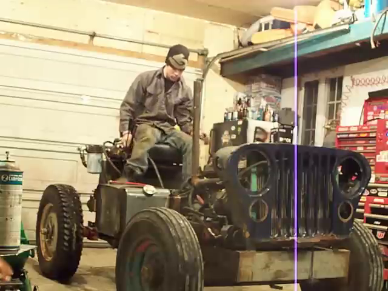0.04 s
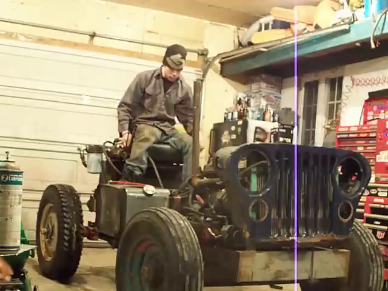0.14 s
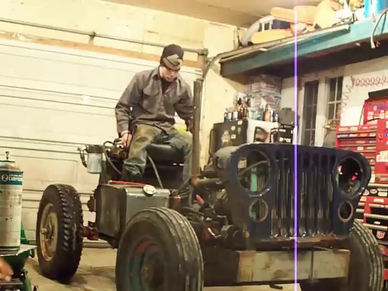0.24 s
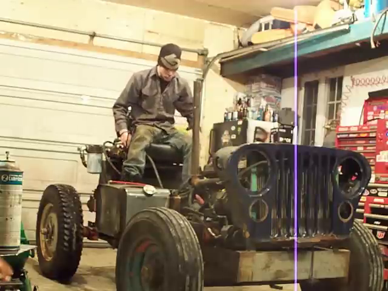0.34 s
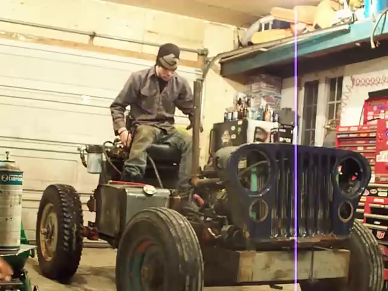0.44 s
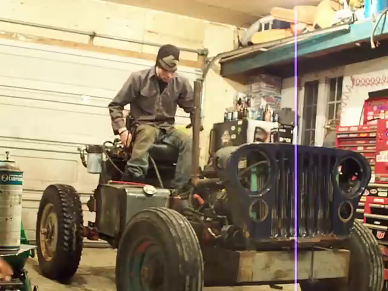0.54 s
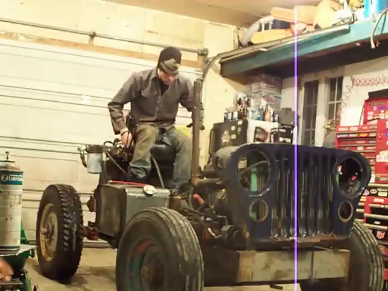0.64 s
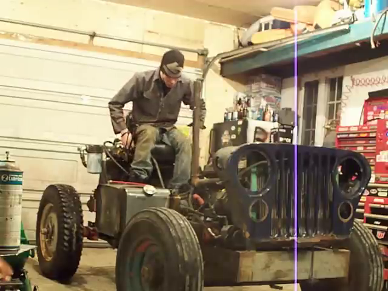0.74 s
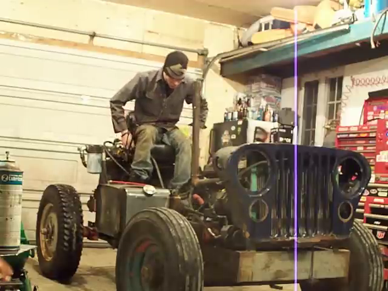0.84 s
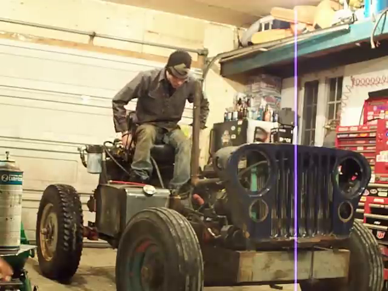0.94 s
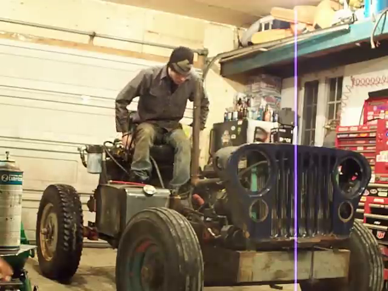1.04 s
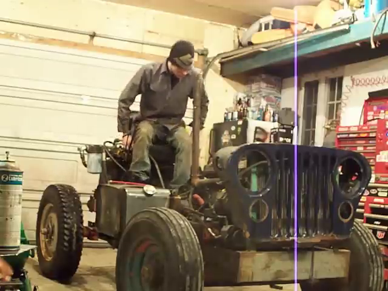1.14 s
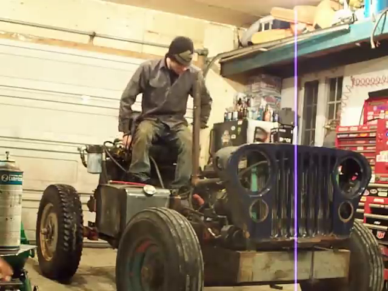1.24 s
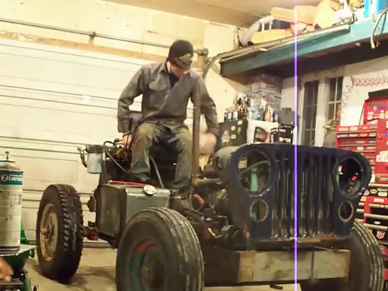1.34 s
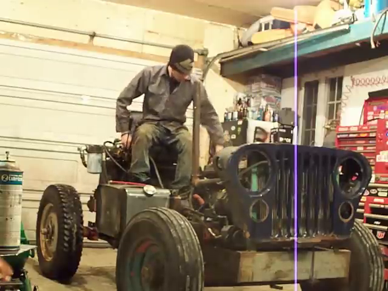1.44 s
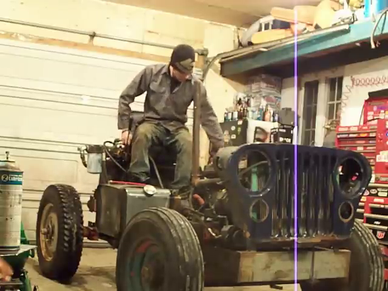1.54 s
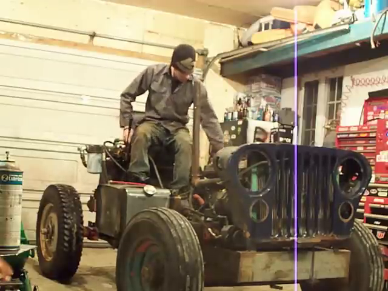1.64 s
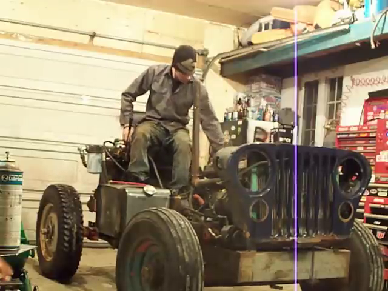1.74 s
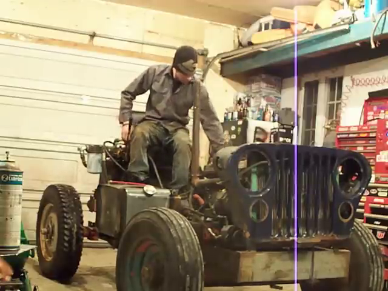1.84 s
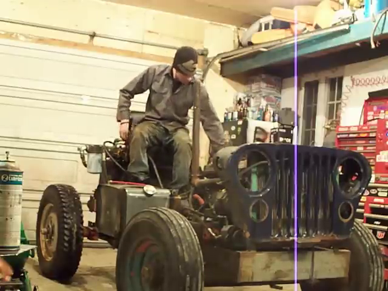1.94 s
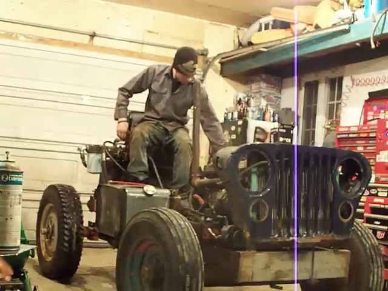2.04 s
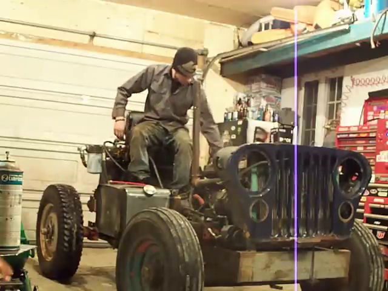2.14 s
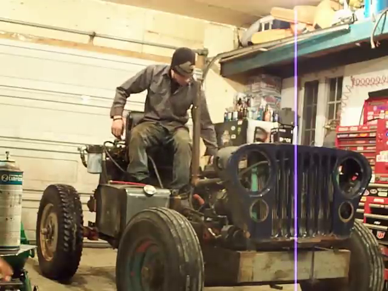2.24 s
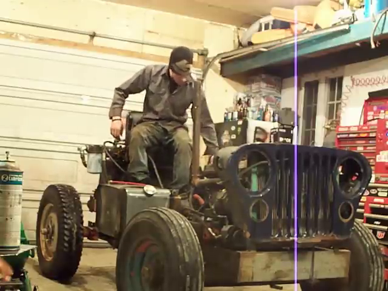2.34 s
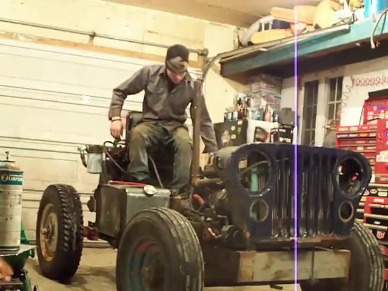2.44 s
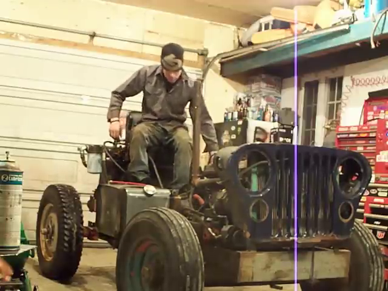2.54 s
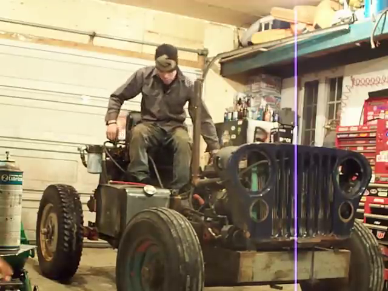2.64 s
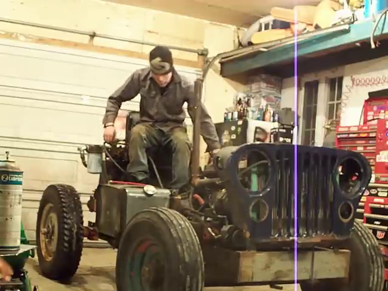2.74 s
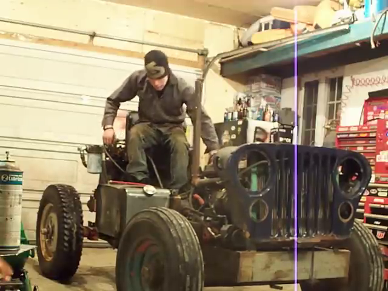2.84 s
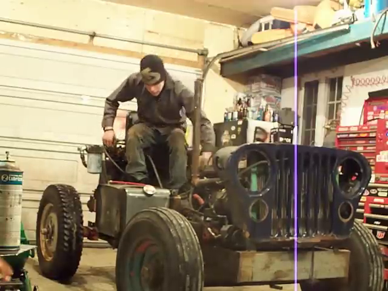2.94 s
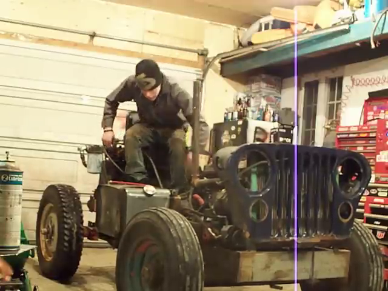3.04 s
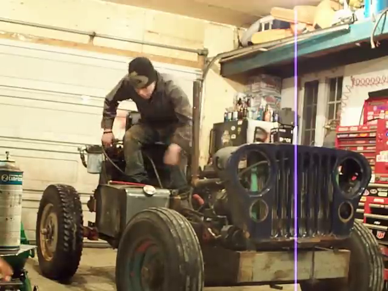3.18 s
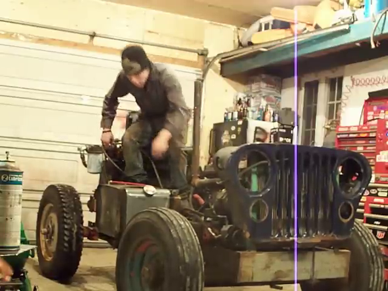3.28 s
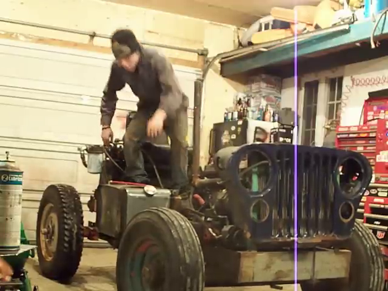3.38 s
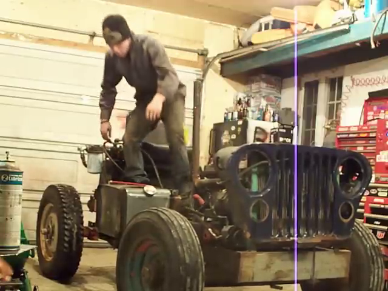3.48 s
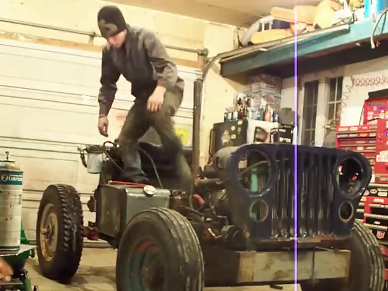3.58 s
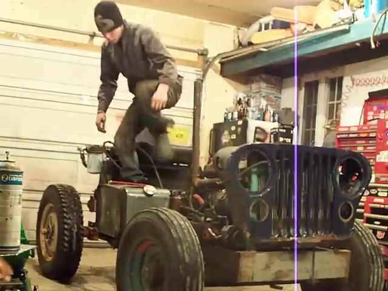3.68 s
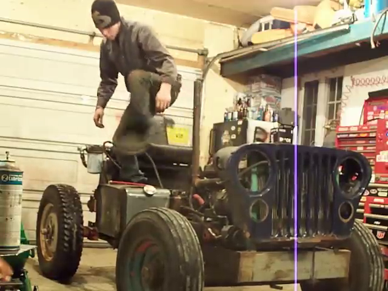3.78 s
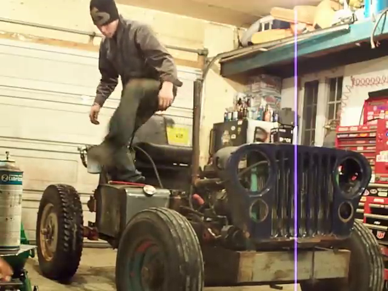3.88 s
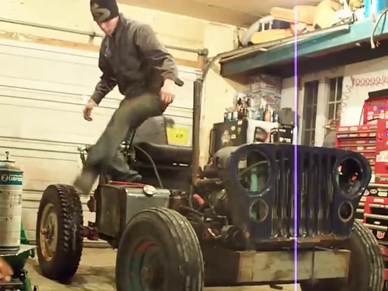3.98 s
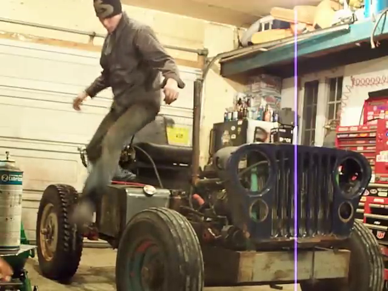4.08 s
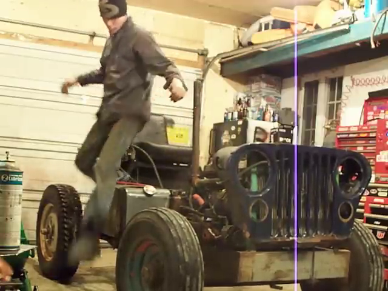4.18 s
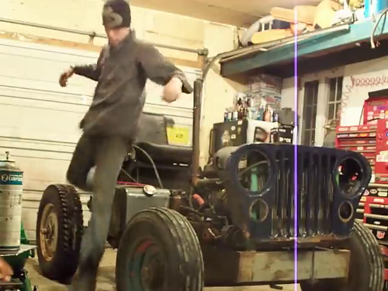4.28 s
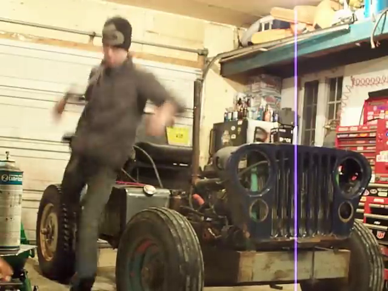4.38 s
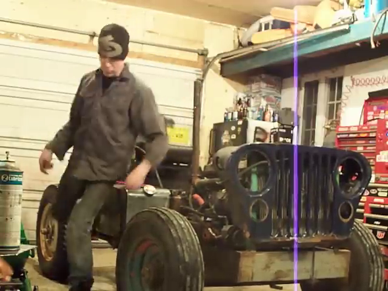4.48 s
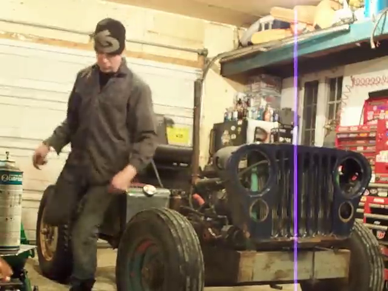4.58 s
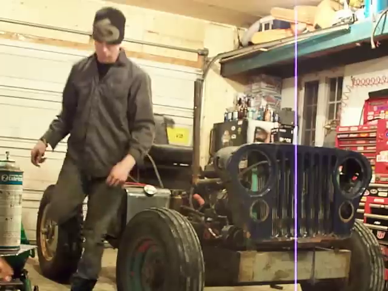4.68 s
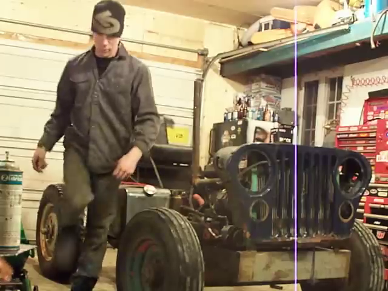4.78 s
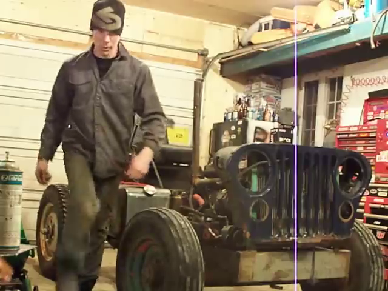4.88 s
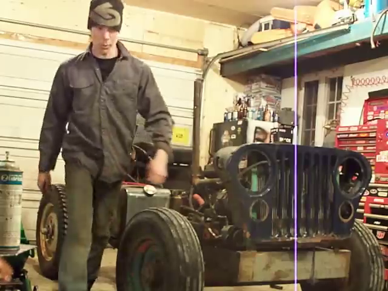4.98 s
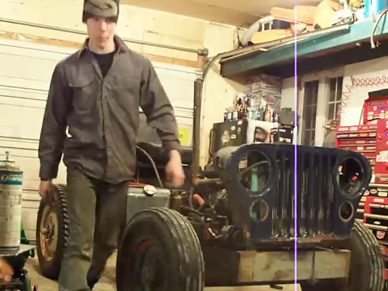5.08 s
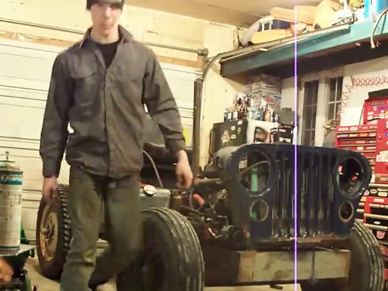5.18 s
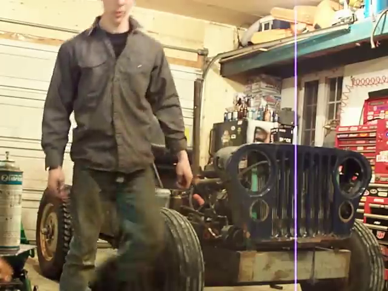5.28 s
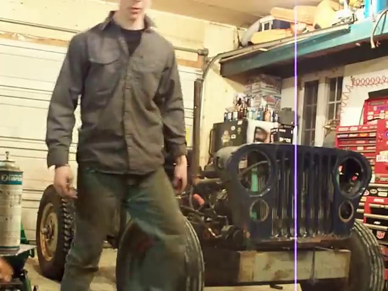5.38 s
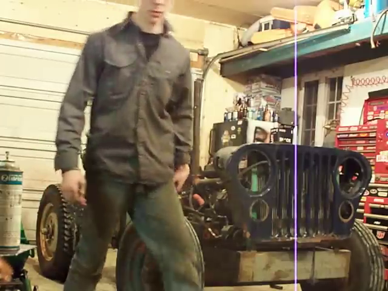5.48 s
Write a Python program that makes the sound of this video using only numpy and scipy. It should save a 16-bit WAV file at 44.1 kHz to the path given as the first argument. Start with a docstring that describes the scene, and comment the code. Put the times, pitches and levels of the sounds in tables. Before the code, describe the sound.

Loud diesel idle labours, dies and shakes to a halt; the driver climbs off, jumps to the floor and steps away over faint ticking.

```python
"""In a garage, a four-cylinder diesel tractor idles, is shut off and coasts to a rattling stop.
The driver climbs over the creaking frame, jumps to the floor and steps away.
Faint paired ticks run through it all from the engine's stop onward.
The engine is trains of blows ringing through noise bursts, plus steady noise and low exhaust tones.
The driver is bursts of filtered noise; the ticks, snaps and thumps are filtered clicks."""
import sys
import numpy as np
from scipy import signal
from scipy.fft import rfft, irfft
from scipy.io import wavfile
from scipy.ndimage import uniform_filter1d

SR = 44100
rng = np.random.default_rng(int(sys.argv[2]) if len(sys.argv) > 2 else 0)


def unload_wav(signal):
    """Save mono or channel-first audio to the path in sys.argv[1] as 16-bit WAV at rate SR, clipped to [-1, 1]."""
    wavfile.write(
        sys.argv[1],
        SR,
        np.round(np.clip(np.atleast_2d(signal).T, -1, 1) * 32767).astype(np.int16),
    )


N = 243431
TIME = np.arange(N) / SR  # seconds
GARAGE_T60_S = 0.62  # time for the room's echo to fall by 60 dB
SHUT_OFF_S, STALL_S = 2.22, 2.923  # the fuel starts to close; the engine all but stands

# The driver knocks against the seat and frame. Each row: start in seconds, level in dB,
# time to fall by 60 dB in seconds, level of the rustling clothes in dB.
KNOCKS = [(3.095, -42, .5, -66), (3.134, -48, 0.27, -71), (3.222, -39.5, 0.14, -69),
          (3.234, -31.5, .11, -68), (3.267, -44, 0.37, -62), (3.42, -48.5, 0.52, -59),
          (3.492, -41.5, 0.37, -51.5), (3.565, -52, 0.73, -60), (3.672, -49.5, 0.29, -72),
          (3.873, -56, 0.2, -58.5)]
# Boots land on the floor. Each row: start in seconds, level in dB,
# time to fall by 60 dB in seconds, level of the rustling clothes in dB.
STEPS = [(4.196, -51, .43, -56), (4.246, -54, 0.61, -64), (4.3244, -19, 0.085, -64),
         (4.335, -32, 0.27, -64), (4.36, -33.5, 0.34, -61), (4.976, -43.5, 0.23, -57.5),
         (5.05, -52, 0.47, -61)]


def from_db(db):
    """Turn decibels into gain."""
    return 10 ** (np.asarray(db) / 20)


def rms_one(x):
    """Scale a sound to an rms of 1."""
    return x / np.sqrt(np.mean(x ** 2) + 1e-20)


def evened(x, size=5500):
    """Hold the rms near 1 over about one engine cycle at idle (size in samples)."""
    power = np.maximum(uniform_filter1d(x * x, size), 0)
    return x / np.sqrt(power + 1e-6 * np.mean(x * x))


def through(x, response):
    """Pass a sound through an impulse response."""
    return signal.fftconvolve(x, response)[:N]


def response_of(spectrum, size=8192):
    """Make an impulse response that starts at once (minimum phase), has this spectrum and peaks at 1."""
    hz, db = np.transpose(spectrum)
    grid = np.maximum(np.arange(size // 2 + 1) * SR / size, 1)
    octaves_above = np.maximum(np.log2(grid / hz[-1]), 0)
    octaves_below = np.maximum(np.log2(hz[0] / grid), 0)
    # beyond the listed points the spectrum falls 20 dB per octave
    shape = np.interp(np.log(grid), np.log(hz), db) - 20 * (octaves_above + octaves_below)
    # folding the cepstrum forward in time gives minimum phase
    cepstrum = irfft(np.log(from_db(shape)))
    cepstrum[1:size // 2] *= 2
    cepstrum[size // 2 + 1:] = 0
    response = irfft(np.exp(rfft(cepstrum)))
    return response / np.abs(response).max()


def noise(spectrum):
    """Make steady noise of this colour with an rms of 1."""
    return rms_one(through(rng.standard_normal(N), response_of(spectrum)))


def dying(start, t60):
    """A gain that jumps to 1 and falls by 60 dB in t60 seconds."""
    return (TIME >= start) * from_db(-60 * np.maximum(TIME - start, 0) / t60)


def burst(t60, size=22050):
    """Dense ringing: half a second of noise that dies away, with unit energy."""
    ring = rng.standard_normal(size) * from_db(-60 * TIME[:size] / t60)
    return ring / np.linalg.norm(ring)


def resonate(x, hz, width_hz):
    """One resonance with a gain of 1 on top; a narrower one rings longer."""
    r = np.exp(-np.pi * width_hz / SR)
    top = np.array([1, 0, -1]) * (1 - r * r) / 2
    return signal.lfilter(top, [1, -2 * r * np.cos(2 * np.pi * hz / SR), r * r], x)


def with_resonances(x, rows):
    """Add resonances to a sound; each row: pitch in Hz, width in Hz, gain in dB."""
    return x + sum(from_db(db) * resonate(x, hz, width_hz) for hz, width_hz, db in rows)


def garage(x, wet_db):
    """Mix in the room's scattered echo, keeping about the same power."""
    wet = from_db(wet_db)
    return (x + wet * through(x, burst(GARAGE_T60_S))) / np.hypot(1, wet)


def clicks(rows):
    """One single-sample click for each row of seconds and dB."""
    out = np.zeros(N)
    for s, db in rows:
        out[int(s * SR)] += from_db(db)
    return out


def crankshaft():
    """The engine's speed curve, and the turns made so far with a slight random hunting."""
    # The slowing crankshaft. Each row: time in seconds, speed in turns per second before the hunting.
    speed_curve = [(0, 15.95), (2.24, 15.95), (2.38, 12.5), (2.55, 9.6), (2.75, 7.0), (2.95, 4.0),
                   (3.2, 1.0)]
    speed = np.interp(TIME, *np.transpose(speed_curve))
    hunting = np.interp(TIME, np.linspace(0, TIME[-1], 60), rng.standard_normal(60))
    turns = np.cumsum(speed * (1 + .004 * hunting)) / SR
    return speed, turns


def throbbing(lag_s):
    """The slow beat of the idle, about one a cycle, as a wave from -1 to 1."""
    throb_hz, crest_s = 8.3, .087
    return np.cos(2 * np.pi * throb_hz * (TIME - crest_s - lag_s))


def jolting():
    """Rises in dB of the clatter and hiss: each jolt swells quickly, then dies away."""
    # The slowing engine jolts and its loose parts rattle up. Each row: start in seconds,
    # clatter rise in dB and hiss rise in dB (both before smoothing), time to die away in seconds.
    jolts = [(2.43, 1.6, 4, 1.8), (2.885, 6, 2.5, .45)]
    rises = sum(np.outer([clatter_db, hiss_db], dying(s, t60)) for s, clatter_db, hiss_db, t60 in jolts)
    return uniform_filter1d(rises, size=int(.035 * SR))  # swells over 0.035 s


def after_stall(t60):
    """A gain of 1 until the engine stalls, then falling by 60 dB in t60 seconds."""
    return from_db(-60 * np.maximum(TIME - STALL_S, 0) / t60)


def blows(turns, t60, common_db, loose_db, wash_db, uneven_db, jitter_s, accent):
    """Four blows a turn: a shared ring, one for each place in the cycle, loose rattle and room wash."""
    # The eight blows of one two-turn cycle, firings and valve closings in turn.
    # Each entry: strength in dB before the accent factor.
    cycle_db = np.array([2.5, -2.4, -2.9, -3.5, 1.5, -6, 3.5, -5.5])
    at = np.flatnonzero(np.diff(np.floor(4 * turns), prepend=-1))
    chance = rng.standard_normal((len(at), 2))
    place = np.arange(len(at)) % len(cycle_db)
    force = from_db(accent * cycle_db[place] + uneven_db * chance[:, 0])
    at = np.clip(at + (jitter_s * SR * chance[:, 1]).astype(int), 0, N - 1)
    common = from_db(common_db) * burst(t60)
    out, energy = np.zeros(N), np.zeros(N)
    for k in range(len(cycle_db)):
        train = np.zeros(N)
        train[at[place == k]] = force[place == k]
        out += through(train, common + burst(t60))
        energy += train ** 2
    # rattle and wash are noise that follows the energy of the blows
    for db, decay_s in (loose_db, t60), (wash_db, GARAGE_T60_S):
        decay = dying(0, decay_s)[:SR // 2] ** 2
        swell = np.sqrt(np.abs(through(energy, decay / decay.sum())))
        out += from_db(db) * swell * rng.standard_normal(N)
    return out


def combustion_knock(turns, fuel, labour, throb):
    """Firings and valve closings ring the block and its panels; the rings overlap into a dense clatter."""
    # Resonances of the engine block and panels. Each row: pitch in Hz, width in Hz, gain in dB.
    block = [(474, 35, 1.5), (640, 30, -10.5), (856, 45, -6.5), (1108.6, 11, 1.5), (1140, 22, -4.5),
             (1311, 3.9, 4.5), (1650, 8, 1.5), (1743, 29, 2), (1844, 20, -0.5), (2060, 45, 3),
             (2218, 120, 0.5), (2440, 41, -1.5)]
    # Colour of the knock. Each row: frequency in Hz, level in dB.
    firing = [(220, -29.5), (380, -1), (411, -13.5), (514, 0), (625, 0), (759, -4.5), (861, -1.5),
              (1020, -8.5), (1110, -5), (1530, -5), (1770, -1), (1920, -5), (2400, -8.5), (3210, -17),
              (3900, -29), (5070, -68), (8580, -120)]
    knock = blows(turns, t60=0.13, common_db=-8.5, loose_db=-4.5, wash_db=-1,
                  uneven_db=1.0, jitter_s=.00005, accent=0.42)
    knock = through(with_resonances(knock, block), response_of(firing))
    # labouring makes it louder and its throb deeper
    level_db = -19 + 1.04 * labour + (0.84 + 4.7 * labour) * throb
    return from_db(level_db) * np.sqrt(fuel) * evened(knock)


def coasting_roar(turns, fuel, motion, jolt_db):
    """Without fuel, parts rub in a smooth roar; their separate blows fade with the speed."""
    # Colour of the coasting engine. Each row: frequency in Hz, level in dB.
    coasting = [(180, -42.5), (300, -24.5), (356, -2.5), (414, -8.5), (471, 1.5), (693, -2.5), (823, 1),
                (1050, -1), (1150, -3.5), (1820, -5), (2210, -9.5), (2410, -5.5), (3500, -16),
                (3900, -23.5), (5070, -50.5), (8580, -120)]
    rattle = blows(turns, t60=0.12, common_db=-24.0, loose_db=1.5, wash_db=10.0,
                   uneven_db=2.5, jitter_s=0.0015, accent=0.45)
    rattle = from_db(-1.5) * motion * rms_one(through(rattle, response_of(coasting)))
    level_db = -24.5 + 3.5 * np.log2(motion) + jolt_db  # loses 3.5 dB per halving of speed
    return from_db(level_db) * np.sqrt(1 - fuel) * evened(noise(coasting) + rattle)


def exhaust(turns, fuel, motion, throb):
    """The exhaust puffs with the throb while fuel burns, then only blows air."""
    # Colour of the exhaust. Each row: frequency in Hz, level in dB.
    pipe = [(59, -45.5), (100, -21), (123, -5.5), (151, -5.5), (182, -0.5), (285, 2), (440, -7), (570, -39),
            (970, -120)]
    puffs = blows(turns, t60=0.031, common_db=-12.5, loose_db=-5.0, wash_db=-13.0,
                  uneven_db=-1.0, jitter_s=0.0012, accent=0.5)
    puffs = evened(through(puffs, response_of(pipe)))
    puffs = from_db(0.2 * throb - 0.5) * np.sqrt(fuel) * puffs
    blowing = from_db(-3.5) * np.sqrt(1 - fuel) * noise(pipe)
    return from_db(-37 + 8.5 * np.log2(motion)) * (puffs + blowing)  # loses 8.5 dB per halving of speed


def drone(turns, fuel, throb):
    """The exhaust's low harmonics throb under load; only the lowest outlast the fuel."""
    # Tones of the drone. Each row: multiple of crank speed, rms level in dB before the swell.
    harmonics = [(2, -69), (4, -60.5), (8, -45), (12, -44), (20, -44), (24, -41), (32, -37), (40, -40),
                 (44, -42)]
    out = 0
    for multiple, db in harmonics:
        tone = np.sqrt(2) * from_db(db) * np.sin(2 * np.pi * (multiple * turns + rng.random()))
        if multiple > 6:
            swell = fuel * (1 + .45 * throb)
        else:
            swell = np.interp(TIME, [2.55, 2.95], [1, 0])
        out = out + tone * swell
    return out


def engine_hiss(turns, motion, labour, throb, jolt_db):
    """Steady hiss, with a fine sizzle from light metal contacts."""
    # Colour of the hiss. Each row: frequency in Hz, level in dB.
    hiss_colour = [(2530, -38), (4300, -13), (4610, -10), (5300, -5.5), (6860, -2), (7580, -5),
                   (8100, -9.5), (8450, -18.5), (8870, -33.5), (11500, -57), (19500, -120)]
    sizzle = blows(turns, t60=0.052, common_db=-16, loose_db=-1, wash_db=10,
                   uneven_db=6.5, jitter_s=.0001, accent=0.65)
    sizzle = from_db(-0.5) * motion * rms_one(through(sizzle, response_of(hiss_colour)))
    level_db = -35 + 2.75 * np.log2(motion)  # loses 2.75 dB per halving of speed
    level_db = level_db + jolt_db + .5 * throb + .8 * labour
    return from_db(level_db) * evened(noise(hiss_colour) + sizzle)


def shudder():
    """A low rumble as the slowing engine shakes on its mounts."""
    shaking = np.interp(TIME, [2.25, 2.5, 2.87, 2.96], [0, 1, .8, 0])
    rumble = noise([(25, -20), (42, -10), (65, -9), (100, -6), (135, -5.5), (190, -11.5)])
    return from_db(-60) * shaking * rumble


def engine():
    """Fuel and crank speed shape the layers: the engine labours, the fuel closes, then it slows and stalls."""
    speed, turns = crankshaft()
    motion = speed / speed.max()
    fuel = 0.84 * np.clip(1 - (TIME - SHUT_OFF_S) / 0.076, 0, 1)  # closes in 0.076 s
    labour_from_s = 1.85
    labour = np.clip((TIME - labour_from_s) / (SHUT_OFF_S - labour_from_s), 0, 1) * fuel
    exhaust_throb = fuel * throbbing(lag_s=0)
    knock_throb = fuel * throbbing(lag_s=.034)  # the clatter throbs later than the exhaust
    clatter_jolt_db, hiss_jolt_db = jolting()
    clatter = combustion_knock(turns, fuel, labour, knock_throb)
    clatter = clatter + coasting_roar(turns, fuel, motion, clatter_jolt_db)
    clatter = clatter + exhaust(turns, fuel, motion, exhaust_throb)
    hiss = engine_hiss(turns, motion, labour, knock_throb, hiss_jolt_db)
    fading = clatter * after_stall(t60=1) + hiss * after_stall(t60=0.77)
    return fading + drone(turns, fuel, exhaust_throb) + shudder()


def still_air():
    """Soft coloured noise and a faint steady whine from narrowly filtered noise."""
    # Colour of the still air. Each row: frequency in Hz, level in dB.
    air_colour = [(15, -50.5), (25, -5.5), (101, -11.5), (206, -5.5), (313, -12), (420, -2.5), (738, -7.5),
                  (1430, -11), (2520, -18), (3300, -23), (4220, -33), (5130, -23.5), (6720, -18.5),
                  (7980, -22), (8800, -43), (11400, -65), (19400, -120)]
    whine = rms_one(resonate(rng.standard_normal(N), hz=6520, width_hz=160))
    return from_db(-62.5) * noise(air_colour) + from_db(-78) * whine


def thumps():
    """Dull thumps under the idle: clicks through a low-pitched response, with no room echo."""
    # When the thumps come. Each row: start in seconds, peak level in dB.
    thump_times = [(.327, -29), (.71, -29)]
    # Colour of a thump. Each row: frequency in Hz, level in dB.
    thump_colour = [(20, -4.5), (70, -7), (140, -4), (400, -11.5), (2000, -45)]
    return through(clicks(thump_times), response_of(thump_colour))


def creaking():
    """The frame creaks under the driver's weight: noise through two equal resonances dies away."""
    # The creaks. Each row: start in seconds, pitch in Hz, level in dB, time to fall by 60 dB in seconds.
    creak_rows = [(2.733, 1036, -25.5, 0.42), (2.73, 7060, -29.5, 0.14), (2.88, 7840, -36.5, 0.28),
                  (2.985, 6680, -37, 0.14), (3.06, 353, -42.5, 0.46), (3.14, 6800, -54, 0.3),
                  (3.31, 6880, -52, 0.21), (3.42, 1095, -54, 0.33), (3.422, 1430, -57, 0.81),
                  (3.675, 1594, -55, 0.37), (4.875, 1320, -68, 1.0)]
    out = 0
    for s, hz, db, t60 in creak_rows:
        width_hz = 0.052 * hz
        ringing = resonate(resonate(rng.standard_normal(N), hz, width_hz), hz, width_hz)
        out = out + from_db(db) * dying(s, t60) * rms_one(ringing)
    return out


def thuds(rows, spectrum, wet_db):
    """Each blow sets a heavy, well-damped body ringing into the room."""
    force = sum(from_db(db) * dying(s, t60) for s, db, t60, _ in rows)
    body = response_of(spectrum)
    body = body / np.linalg.norm(body)
    return garage(through(force * rng.standard_normal(N), body), wet_db)


def frame_knocks():
    """Dying bursts of noise ring the seat and frame as the driver climbs."""
    # Colour of the frame. Each row: frequency in Hz, level in dB.
    frame = [(76, -56), (130, -13), (182, -26), (237, -10), (362, -4.5), (395, -4.5), (572, -1),
             (694, -2.5), (1200, -5.5), (1310, -6.5), (1560, -12.5), (2900, -26.5), (4120, -43),
             (6870, -29), (8800, -51), (11400, -77), (19400, -120)]
    return thuds(KNOCKS, frame, wet_db=-3.0)


def ticking():
    """Dull ticks in evenly spaced pairs, ten pairs a second: coloured clicks with no room echo."""
    # How loud the ticks are. Each row: time in seconds, level in dB of the first tick before scatter.
    tick_level = [(3.08, -41.5), (3.86, -42.5), (3.98, -38.5), (4.28, -43), (4.58, -32.5), (4.68, -32),
                  (4.8, -40.5), (5.18, -39.5), (5.38, -44.5), (5.48, -38)]
    # Colour of a tick. Each row: frequency in Hz, level in dB.
    tick_colour = [(20, -6), (80, 6), (200, 11), (400, 6), (620, 9), (850, -12.5), (1500, -7.5),
                   (3000, -67)]
    first_s, period_s, pair_s = 3.078, .1, .032
    second_loss_db, scatter_db = 4.5, 0.3
    first = np.arange(first_s, TIME[-1] - pair_s, period_s)
    times = first[:, None] + [0, pair_s]
    db = np.interp(first, *np.transpose(tick_level))[:, None] - [0, second_loss_db]
    db = db + scatter_db * rng.standard_normal(times.shape)
    return through(clicks(zip(times.ravel(), db.ravel())), response_of(tick_colour))


def rustling_clothes():
    """Cloth rubs at each knock and step: softly swelling noise that dies away."""
    cloth = [(300, -10), (1200, 9.0), (2500, 11.5), (3600, -4.0),
             (5200, 1), (6800, 7.0), (8000, 0), (8800, -27)]
    rubbing = sum(from_db(db) * dying(s, t60=0.32) for s, _, _, db in KNOCKS + STEPS)
    return uniform_filter1d(rubbing, size=700) * noise(cloth)


def boot_steps():
    """Boots land on the floor in dull, dying bursts of noise."""
    # Colour of the boots. Each row: frequency in Hz, level in dB.
    boot = [(59, -49), (100, -21), (224, -9), (338, -5), (393, -3), (520, -6), (550, -3.5), (593, -1),
            (663, -7.5), (846, -8.5), (1250, -14.5), (1380, -15), (3650, -48.5), (7300, -44), (8800, -66),
            (11400, -84), (19400, -120)]
    return thuds(STEPS, boot, wet_db=-14)


def dry_snaps():
    """Small snaps: coloured clicks with a brief ring and a little room echo."""
    # When the snaps come. Each row: start in seconds, level in dB before the ring and echo.
    snap_times = [(4.483, -29), (4.784, -30.5)]
    # Colour of a snap. Each row: frequency in Hz, level in dB.
    snap_colour = [(200, -15), (950, 7), (1450, 7), (1900, 5), (2400, -2.5), (3600, -18), (5800, -4),
                   (7200, -5), (8200, -38)]
    # Its brief ring. Each row: pitch in Hz, width in Hz, gain in dB.
    snap_ring = [(1440, 55, 6), (2380, 76, 6)]
    snaps = through(clicks(snap_times), response_of(snap_colour))
    return garage(with_resonances(snaps, snap_ring), wet_db=-14)


def scene():
    """Add up the engine, the still air, the thumps, the driver, the ticks and the snaps."""
    driver = creaking() + frame_knocks() + rustling_clothes() + boot_steps()
    return (engine() + still_air() + thumps() + driver + ticking() + dry_snaps())[None]


def record(dry):
    """The microphone has a deep notch in the treble; the top is cut."""
    notched = dry - .88 * resonate(dry, hz=4200, width_hz=500)
    top_cut = signal.ellip(10, .3, 80, 8900, fs=SR, output="sos")  # cuts above 8900 Hz
    return signal.sosfilt(top_cut, notched)


dry = scene()
out = record(dry)
unload_wav(out)
```